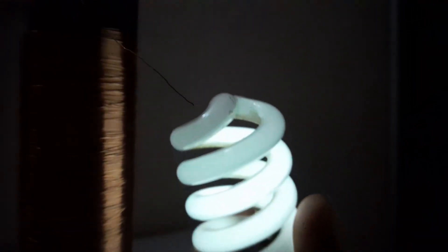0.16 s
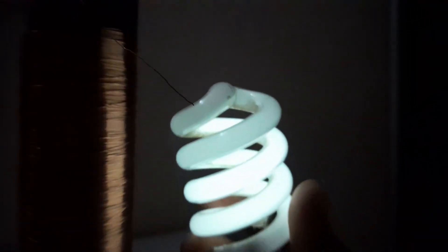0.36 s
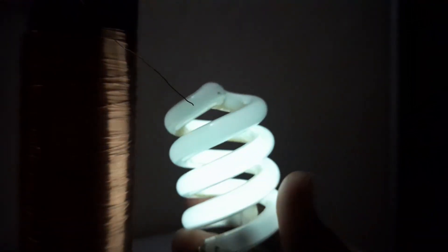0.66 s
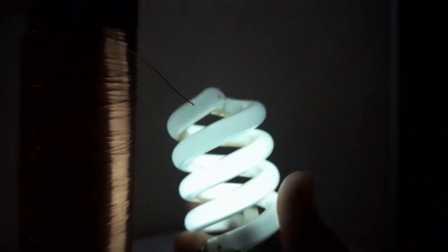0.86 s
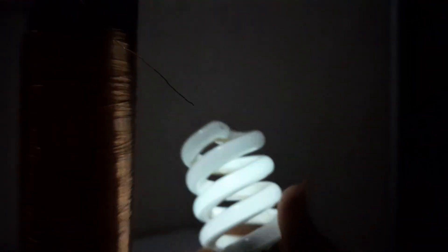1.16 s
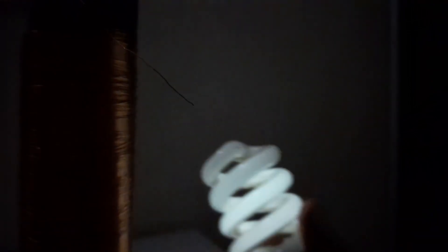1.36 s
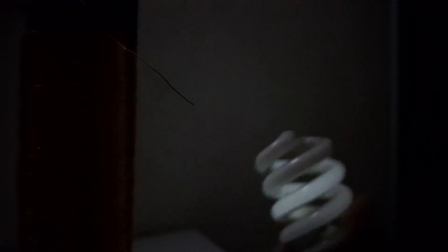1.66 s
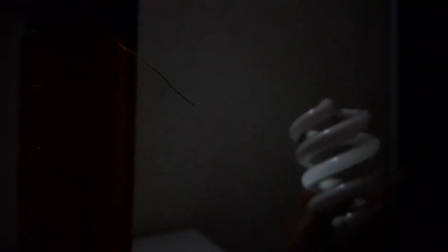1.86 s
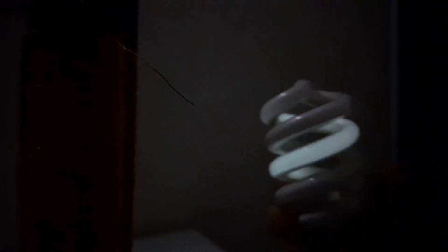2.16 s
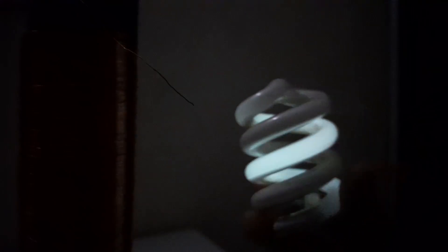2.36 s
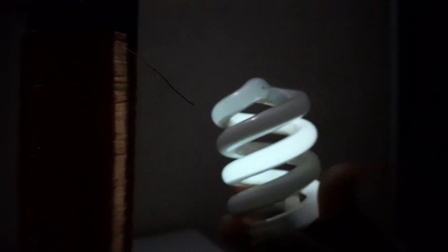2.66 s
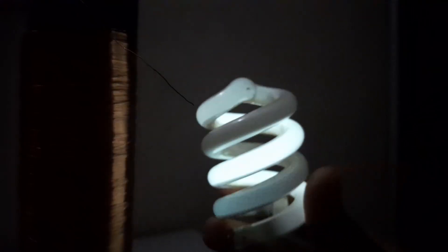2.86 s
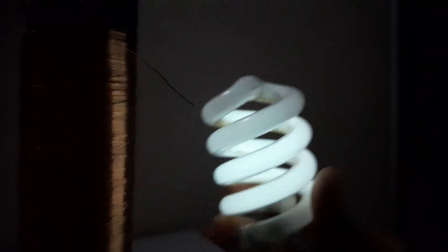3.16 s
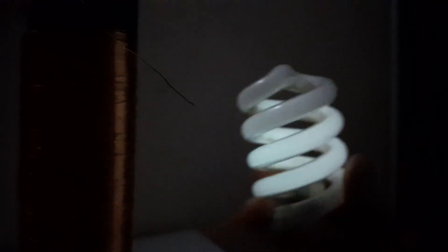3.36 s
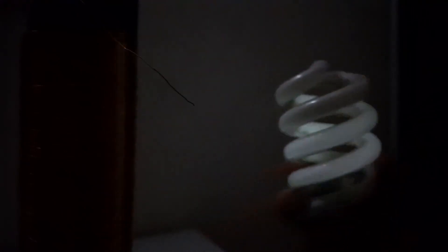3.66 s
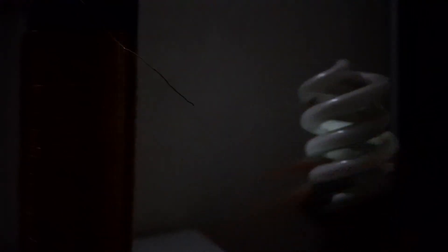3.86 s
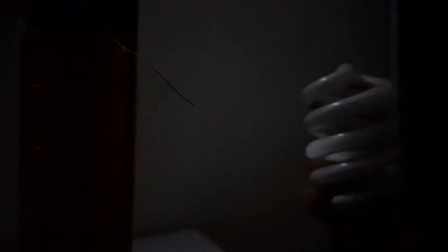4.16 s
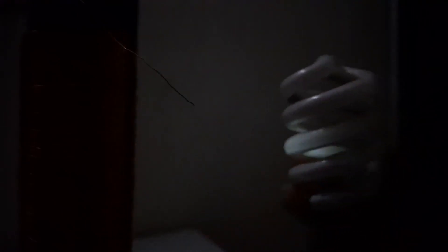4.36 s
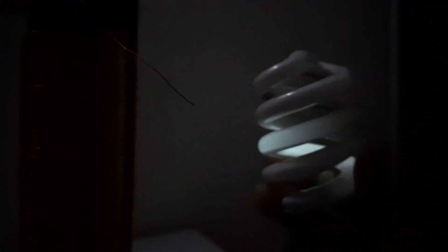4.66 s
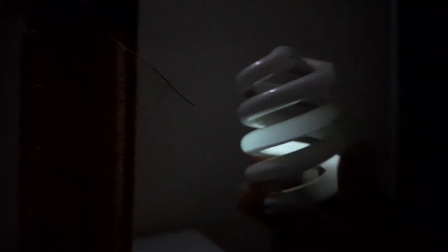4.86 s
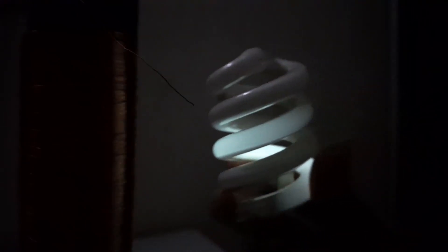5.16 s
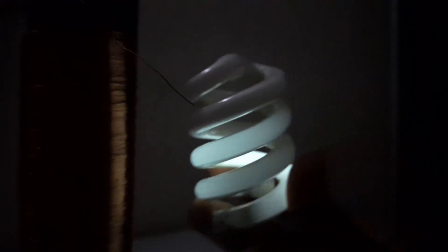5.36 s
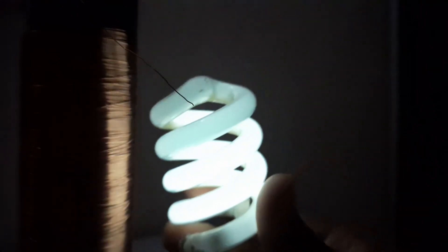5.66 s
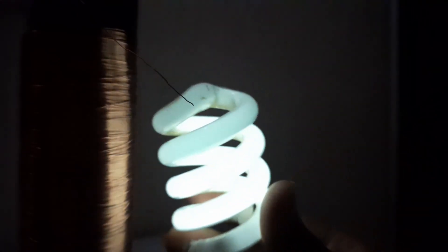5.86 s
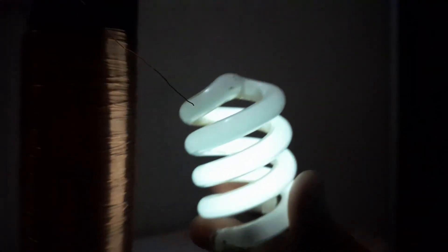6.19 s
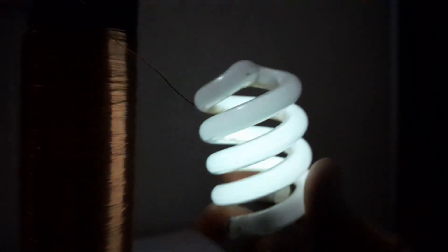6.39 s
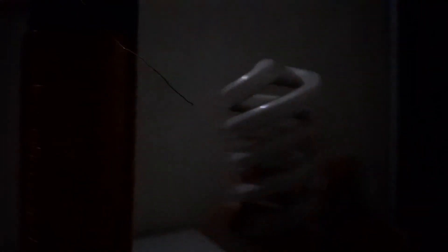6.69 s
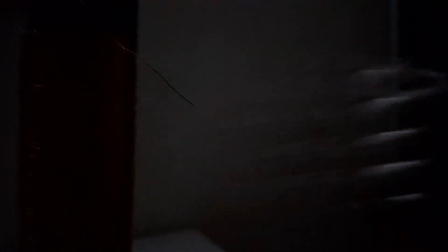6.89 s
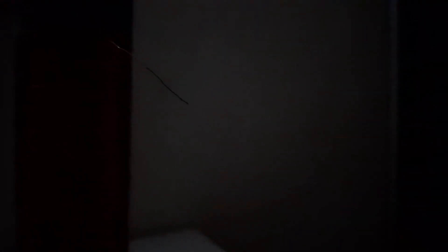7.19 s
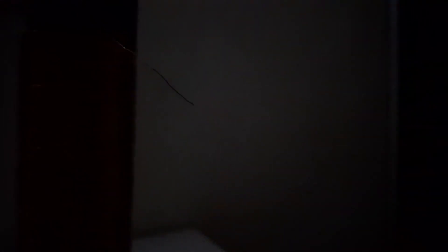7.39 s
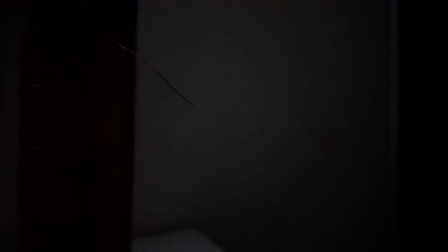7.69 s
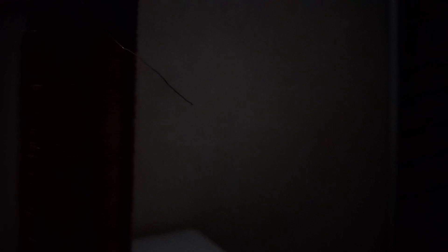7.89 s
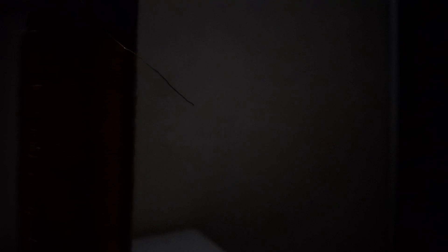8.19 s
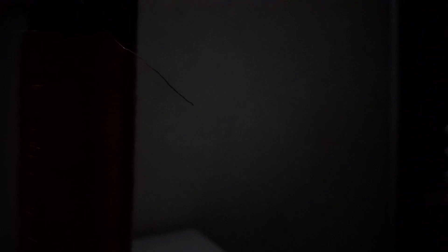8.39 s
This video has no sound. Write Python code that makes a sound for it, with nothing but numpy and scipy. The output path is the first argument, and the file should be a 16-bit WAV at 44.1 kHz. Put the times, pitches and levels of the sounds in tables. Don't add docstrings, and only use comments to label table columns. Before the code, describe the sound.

From 0 s a spark gap arcs without pause very close to a phone in a small room: a loud, rasping electric buzz of about 1450 cracks a second, roughened by mains ripple, bright and hissy with little true bass, louder on the left, where overload adds gritty crackle. Its pitch creeps up very slightly. At about 6.58 s the supply snaps off; the buzz stops dead, a few single sparks tick until 6.72 s, and a short room tail fades. In the quiet, faint hiss and growing low rumble remain; a dull, low knock lands at 6.95 s, then at 7.03 s the hiss steps up and a tiny low creak sounds for a seventh of a second. At 7.29 s the gap strikes again, abruptly, louder and lower in pitch, climbing and settling within about 0.3 s. It then buzzes steadily, slightly higher and more even from 7.5 s, through the end near 8.7 s.

```python
import sys
import numpy as np
from scipy import signal
from scipy.fft import rfft, irfft
from scipy.io import wavfile

SR = 44100
rng = np.random.default_rng(int(sys.argv[2]) if len(sys.argv) > 2 else 0)


def wav_out(sig):
    wavfile.write(sys.argv[1], SR, np.round(np.clip(np.atleast_2d(sig).T, -1, 1) * 32767).astype(np.int16))


def volts(x):
    e = np.asarray(x, float) / 20
    return 10 ** e


N = 376613
T = np.arange(N) / SR

# (time [s], level [dB])
LONE_SPARKS = [
    (6.577, 0),
    (6.6195, 1),
    (6.6226, 2.5),
    (6.72, -4),
    (7.2912, 2),
]
# (delay after direct crack [ms], gain [1])
NEAR_ECHOES = [
    [(0.208, -0.26), (0.308, -0.2), (0.38, 0.46), (0.456, -0.015), (0.592, -0.33), (0.809, -0.43), (1.953, 0.46), (2.417, -0.47), (2.482, -0.26)],
    [(0.15, 0.23), (0.215, -0.56), (0.299, -0.051), (0.376, 0.59), (0.492, 0.26), (1.888, 0.2), (1.979, -0.28), (2.051, 0.37), (2.517, -0.14)],
]
# (frequency [Hz], level [dB])
CRACK_COLOUR = [
    [(1500, -15), (2400, -19.5), (2800, -21.5), (3600, -7), (4600, -2), (5500, -3.5), (6500, -3), (7800, -7.5), (9000, -5.5), (10300, -7.5), (11800, -3), (13200, 0.0), (14500, -2), (15700, -3)],
    [(1500, -8.5), (2400, -19), (2800, -5), (3600, -5.5), (4600, 5), (5500, -11.5), (6500, -4.5), (7800, -4.5), (9000, -6.5), (10300, -4), (11800, -0.5), (13200, -0.5), (14500, 1), (15700, -1.8)],
]
# (frequency [Hz], width [Hz], level [dB])
COLOUR_BELLS = [
    [(1092, 180, -4), (1370, 170, -1.5), (1633, 130, 4.5), (2404, 150, -6), (2748, 204, 10), (2880, 90, -6.5), (3810, 56, -4.5), (4396, 230, -5.5), (4800, 200, -3.5)],
    [(2540, 96, -1.5), (2970, 97, -8.5)],
]
# (frequency [Hz], t60 [s], level left [dB], level right [dB])
ROOM_TAIL = [(1515.4, 0.18, -51.5, -40.5), (2250, .25, -44.5, -44), (3240, 0.2664, -40.5, -39),
             (6030, 0.2, -36, -29), (8900, 0.1146, -36, -36.5), (13100, .23, -40, -34.5)]
# (frequency [Hz], width [Hz], depth [0-1])
BARE_TABLE_DIPS = [(2200, 550, .45), (3800, 210, 0.5)]
# (frequency [Hz], level [dB], t60 [s])
SNAP_BANDS = [(90, -55, .3), (280, -46.5, .15), (700, -46, 0.22), (1600, -30, .22)]
# (frequency [Hz], level [dB], t60 [s])
KNOCK_MODES = [(281.5, -55, 0.2), (375, -60, 0.172), (441, -63, 0.27), (507, -69.5, .1)]

STALL_S, RESTRIKE_S = 6.587, 7.2915
COLD_RATE_HZ, WARMING_HZ_PER_S = 1425, 20
HOTTER_HZ, RESTRIKE_SAG_HZ, REHEAT_S = 65, 220, .17
OVERSHOOT_DB, GRAB_S, SETTLED_DB, FIRST_DB, BUILD_S = 6.5, .2, -0.87, -0.5, .02
SPARK_DB, SCATTER_DB = 5, 1.78
MAINS_RIPPLE_HZ, RIPPLE = 100.3, .28
JITTER, STEADY_JITTER, STEADY_FROM_S = .12, 0.069, 7.5
SPOTS, ARC_WANDER_MS = 3, 0.013
RIGHT_LAG_MS, RIGHT_DB = 0.3266, -8.5
ROOM_FILL_MS = 6.8
PATH_SIZE, LEAD = 16384, 32
HAND_GONE_S = 7.5
HISS_DB, HISS_STEP_DB = -78.5, 5.5
RUMBLE_DB, RUMBLE_STEP_DB, RUMBLE_RISE_DB_PER_S = -75.5, 5.5, 59.5
GAIN_STEP_S, GAIN_SAG_DB_PER_S = 7.033, 7.5
SNAP_S, KNOCK_S = 6.576, 6.948
CREAK_S, CREAK_LENGTH_S, CREAK_HZ, CREAK_DB = 7.034, .14, 243, -61.5
CREAK_FADE_DB_PER_S, CREAK_END_RISE_HZ, CREAK_LET_GO_S, CREAK_AFTER_DB = 26, 20, .02, -14
CLIP_UP, CLIP_DOWN, KNEE, RIGHT_HEADROOM = 0.54, 0.67, 4.61, 1.07


def band(x, lo_hz, hi_hz):
    sos = signal.butter(2, [lo_hz, min(hi_hz, .49 * SR)], "band", fs=SR, output="sos")
    y = signal.sosfilt(sos, x)
    return y / y.std(axis=-1, keepdims=True)


def walk(rate):
    y = np.interp(T * rate, np.arange(N // 100), rng.standard_normal(N // 100))
    return y / y.std()


def burn(t):
    since = np.clip(t - RESTRIKE_S, 0, None)
    again = t >= RESTRIKE_S
    reheating = HOTTER_HZ - RESTRIKE_SAG_HZ * np.exp(-(since / REHEAT_S) ** 2)
    rate = COLD_RATE_HZ + WARMING_HZ_PER_S * t + again * reheating
    db = SETTLED_DB + OVERSHOOT_DB * np.exp(-(since / GRAB_S) ** 2) + FIRST_DB * np.exp(-since / BUILD_S)
    return rate * ((t < STALL_S) | again), db * again


def sparks():
    ripple = np.abs(np.sin(np.pi * MAINS_RIPPLE_HZ * T)) - 2 / np.pi
    pace = burn(T)[0] * (1 + RIPPLE * ripple + .02 * walk(30))
    early_late, strength = rng.standard_normal((2, N // 20))
    done = np.cumsum(pace) / SR
    warm_count = done[int(STEADY_FROM_S * SR)]
    jitter = np.where(np.arange(N // 20) < warm_count, JITTER, STEADY_JITTER)
    charge = np.cumsum(np.clip(1 + jitter * early_late, .4, 2))
    fired = charge < done[-1]
    when = np.interp(charge[fired], done, T)
    db = burn(when)[1] + SCATTER_DB * strength[fired]
    db = db + .3 * np.interp(when, T, walk(6))
    lone_when, lone_db = np.transpose(LONE_SPARKS)
    when, db = np.r_[when, lone_when], np.r_[db, lone_db]
    near = np.floor(when * SR)[:, None] + np.arange(-7, 9)
    off = near - when[:, None] * SR
    click = np.sinc(off) * np.cos(np.pi * off / 16) ** 2 * volts(db + SPARK_DB)[:, None]
    spot = rng.integers(0, SPOTS, (len(when), 1))
    slot = np.clip(near, 0, N - 1).astype(int) + N * spot
    return np.bincount(slot.ravel(), click.ravel(), SPOTS * N).reshape(SPOTS, N)


def bass_shy(trains):
    return signal.sosfilt(signal.butter(6, 1150, "high", fs=SR, output="sos"), trains)


def bare_table(trains):
    for hz, width, depth in BARE_TABLE_DIPS:
        ringing = signal.lfilter(*signal.iirpeak(hz, hz / width, SR), trains)
        trains = trains - depth * (T > HAND_GONE_S) * ringing
    return trains


def arrival(port, lag_ms):
    hz = np.fft.rfftfreq(PATH_SIZE, 1 / SR)
    at, db = np.transpose(CRACK_COLOUR[port])
    bells = sum(top_db / (1 + (2 * (hz - mid_hz) / width) ** 2) for mid_hz, width, top_db in COLOUR_BELLS[port])
    cep = irfft(np.log(volts(np.interp(np.log(hz + 1), np.log(at), db) + bells)))
    cep[1:PATH_SIZE // 2] *= 2
    cep[PATH_SIZE // 2 + 1:] = 0
    tone = np.exp(rfft(cep) - (hz / 18500) ** 16)
    taps = 1 + sum(gain * np.exp(-2j * np.pi * hz * ms / 1000) for ms, gain in NEAR_ECHOES[port])
    return tone, tone * taps * np.exp(-2j * np.pi * hz * lag_ms / 1000)


def path(port):
    wander_ms = ARC_WANDER_MS * np.linspace(-1, 1, SPOTS)[:, None]
    tone, near = arrival(port, port * (RIGHT_LAG_MS + wander_ms))
    t = np.arange(PATH_SIZE) / SR
    tail = 0
    for row in ROOM_TAIL:
        hz, t60 = row[:2]
        noise = band(rng.standard_normal((SPOTS, PATH_SIZE)), hz / 1.184, hz * 1.31)
        tail = tail + volts(row[2 + port] - 60 * t / t60) * noise
    tail = tail * (1 - np.exp(-(t * 1000 / ROOM_FILL_MS) ** 2))
    lead = np.exp(-2j * np.pi * np.fft.rfftfreq(PATH_SIZE) * LEAD)
    fade = np.cos(np.pi / 2 * t / t[-1]) ** 2
    return irfft(lead * (near + tone * rfft(tail))) * fade * volts(port * RIGHT_DB)


def heard(trains, port):
    return signal.fftconvolve(trains, path(port), axes=1)[:, LEAD:N + LEAD].sum(axis=0)


def hiss_and_rumble():
    hiss = band(rng.standard_normal((2, N)), 250, 16000) + .8 * band(rng.standard_normal((2, N)), 170, 900)
    rumble = band(rng.standard_normal(N), 35, 170)
    opened = T >= GAIN_STEP_S
    sag_db = GAIN_SAG_DB_PER_S * np.clip(T - GAIN_STEP_S, 0, RESTRIKE_S - GAIN_STEP_S)
    climb_db = RUMBLE_RISE_DB_PER_S * np.clip(T - KNOCK_S, STALL_S - KNOCK_S, 0)
    hiss_db = HISS_DB + opened * HISS_STEP_DB - sag_db
    rumble_db = RUMBLE_DB + climb_db + opened * RUMBLE_STEP_DB - sag_db
    return hiss * volts(hiss_db) + rumble * volts(rumble_db)


def supply_snap():
    t = np.clip(T - SNAP_S, 0, None)
    bite = 1 + 1.954 * np.exp(-t / 0.0046)
    snap = 0
    for hz, db, t60 in SNAP_BANDS:
        noise = band(rng.standard_normal((2, N)), hz / 1.65, hz * 2.0)
        snap = snap + volts(db - 60 * t / t60) * bite * noise
    return snap * (t > 0) * volts(np.array([[0.], [-5.]]))


def knock():
    t = np.clip(T - KNOCK_S, 0, None)
    modes = sum(volts(db - 60 * t / t60) * np.sin(2 * np.pi * hz * t) for hz, db, t60 in KNOCK_MODES)
    return modes * (1 - np.exp(-t / 0.0072))


def table_creak():
    t = np.clip(T - CREAK_S, 0, None)
    let_go = 1 / (1 + np.exp(-np.clip(4 * (t - CREAK_LENGTH_S) / CREAK_LET_GO_S, -40, 40)))
    hz = CREAK_HZ + CREAK_END_RISE_HZ * 4 * let_go * (1 - let_go)
    phase = 2 * np.pi * np.cumsum(hz * (1 + 0.007 * walk(60))) / SR
    swing = np.sin(phase) * (1 - np.exp(-t / .004))
    return swing * volts(CREAK_DB - CREAK_FADE_DB_PER_S * t + CREAK_AFTER_DB * let_go + .7 * walk(50))


def scene():
    trains = bare_table(bass_shy(sparks()))
    buzz = np.array([heard(trains, port) for port in range(2)])
    return buzz + hiss_and_rumble() + supply_snap() + knock() + table_creak()


def band_limit(x):
    return signal.sosfilt(signal.butter(12, 15780, fs=SR, output="sos"), x)


def record(dry):
    top = np.where(dry > 0, CLIP_UP, CLIP_DOWN) * np.array([[1], [RIGHT_HEADROOM]])
    flat = dry / (1 + np.abs(dry / top) ** KNEE) ** (1 / KNEE)
    return band_limit(flat)


dry = scene()
out = record(dry)
wav_out(out)
```